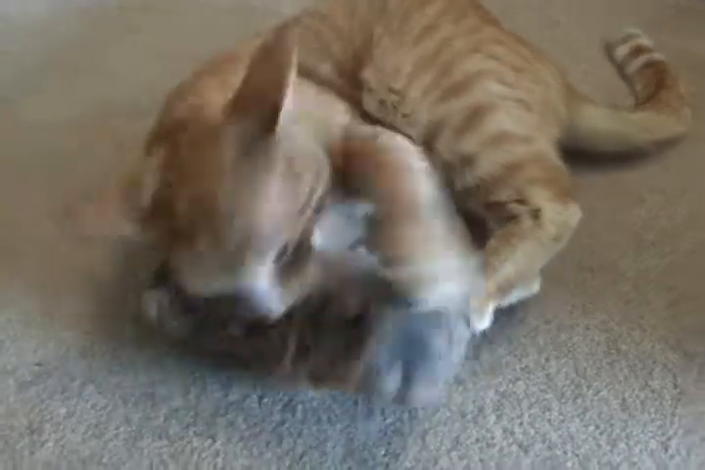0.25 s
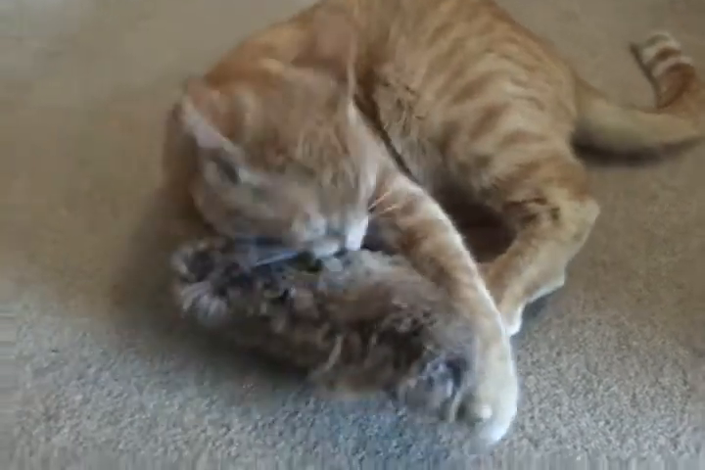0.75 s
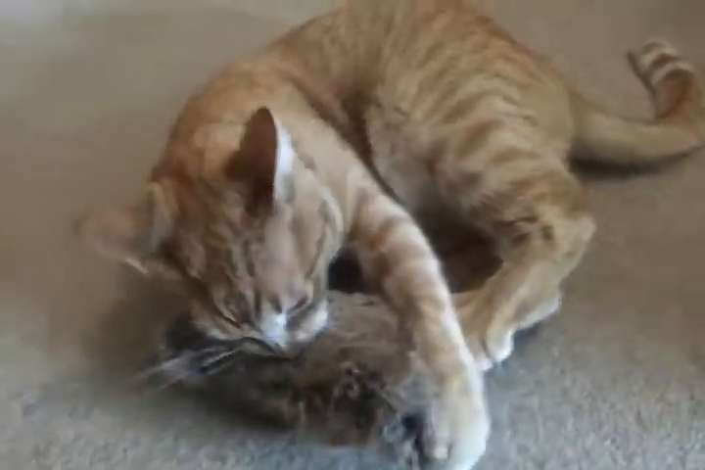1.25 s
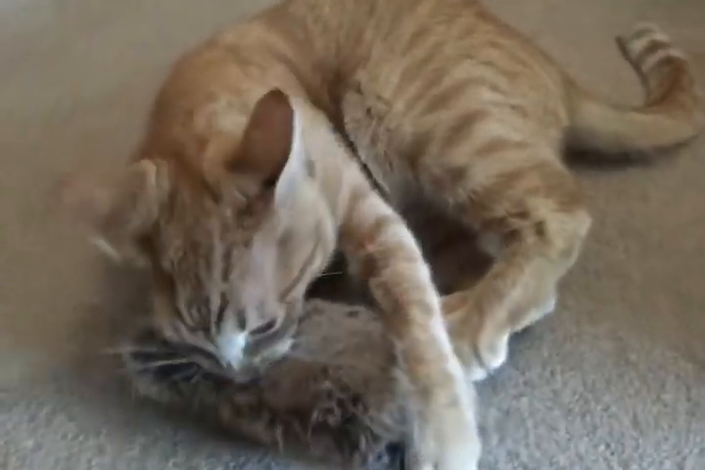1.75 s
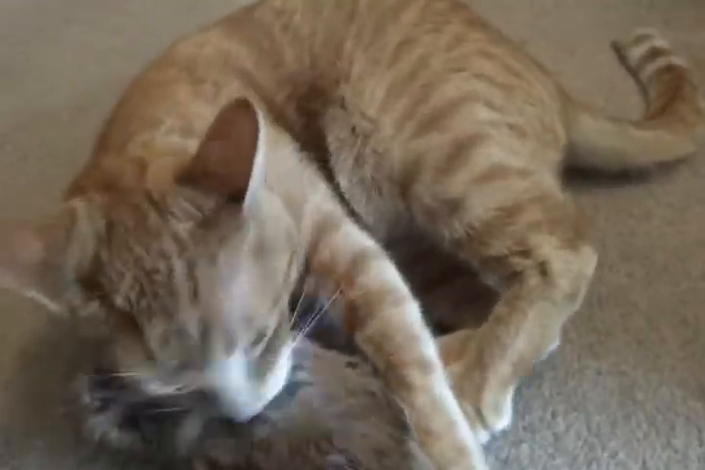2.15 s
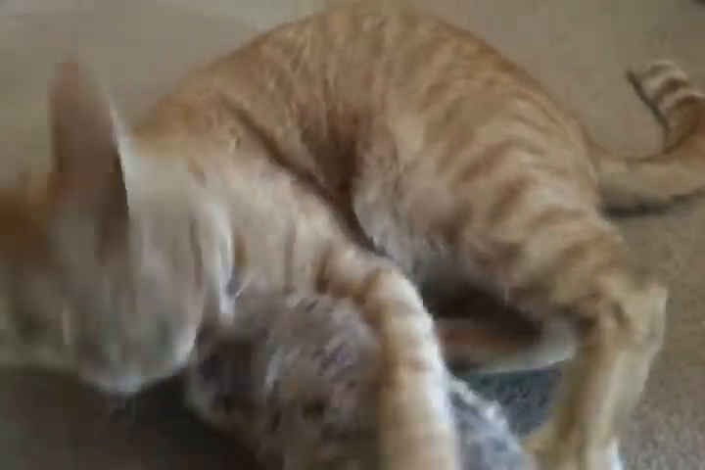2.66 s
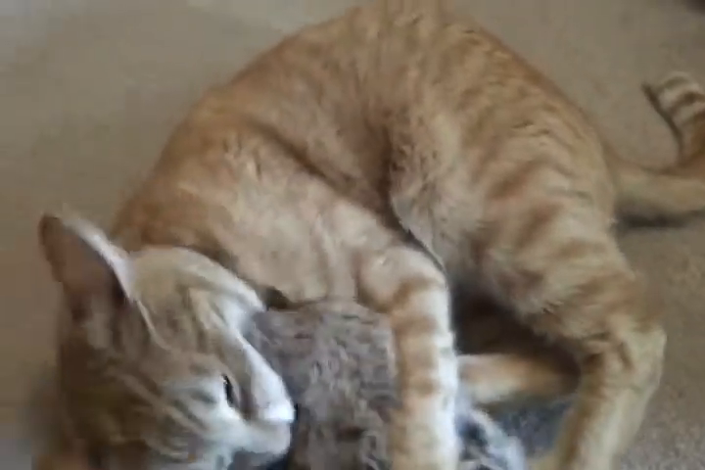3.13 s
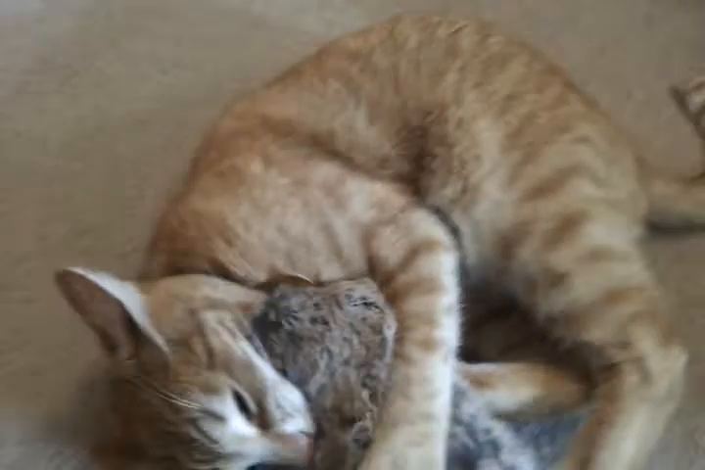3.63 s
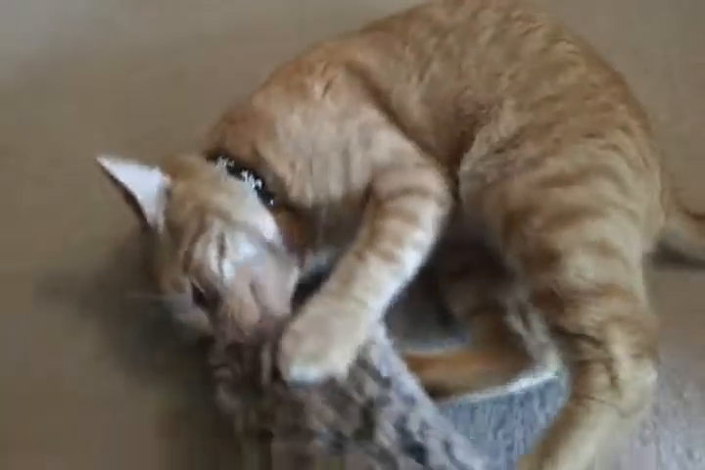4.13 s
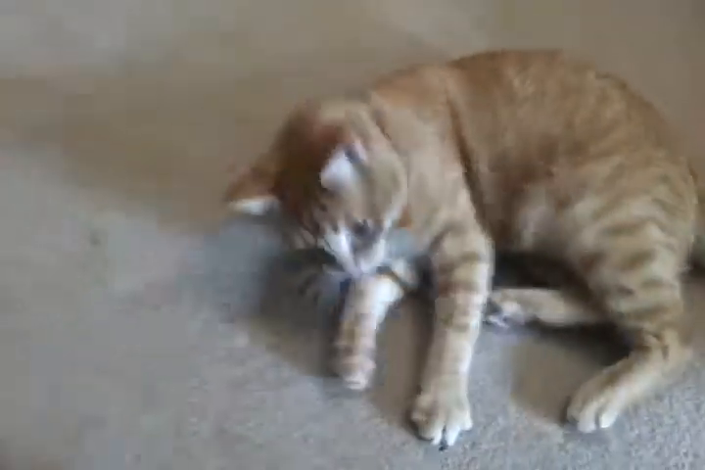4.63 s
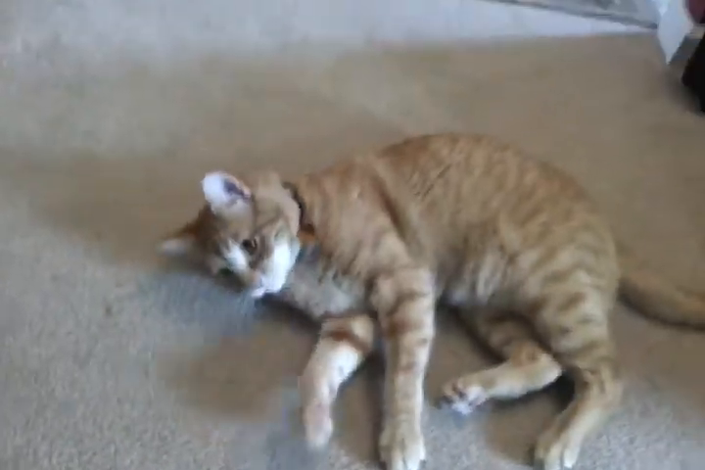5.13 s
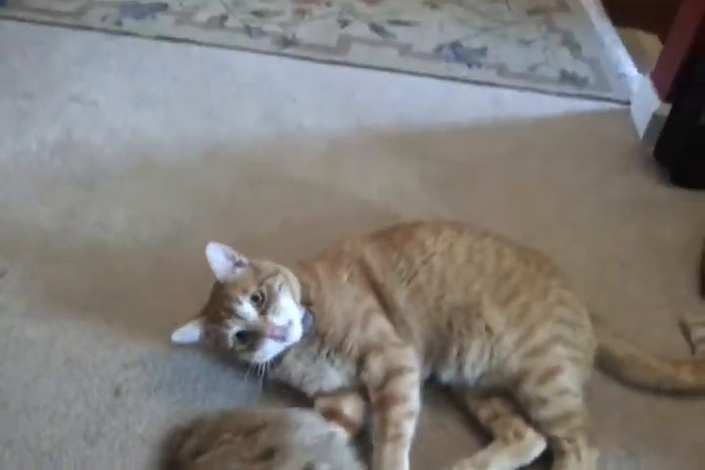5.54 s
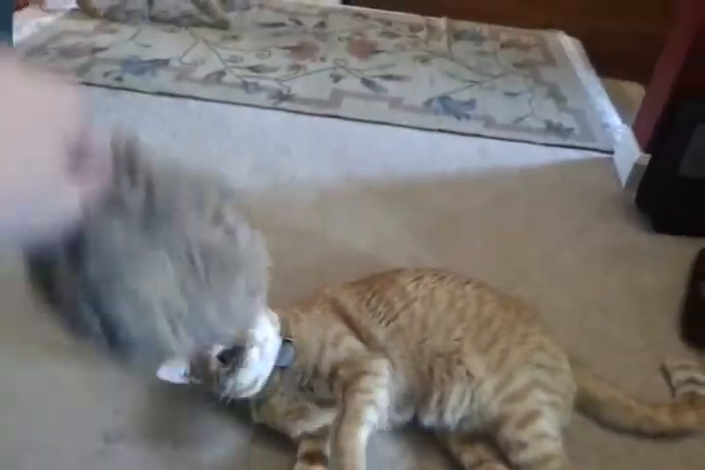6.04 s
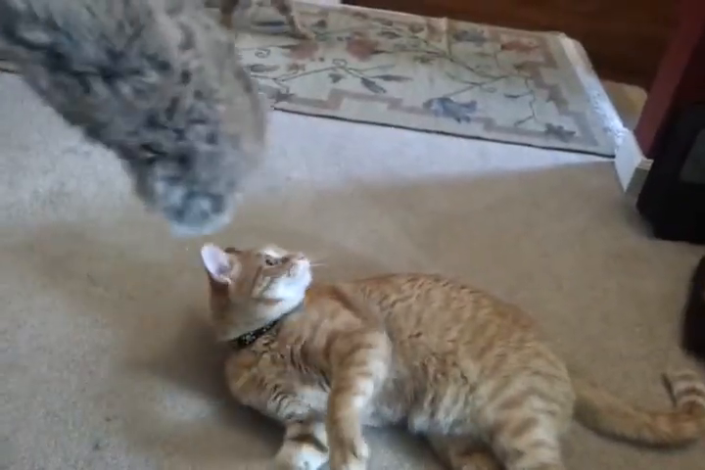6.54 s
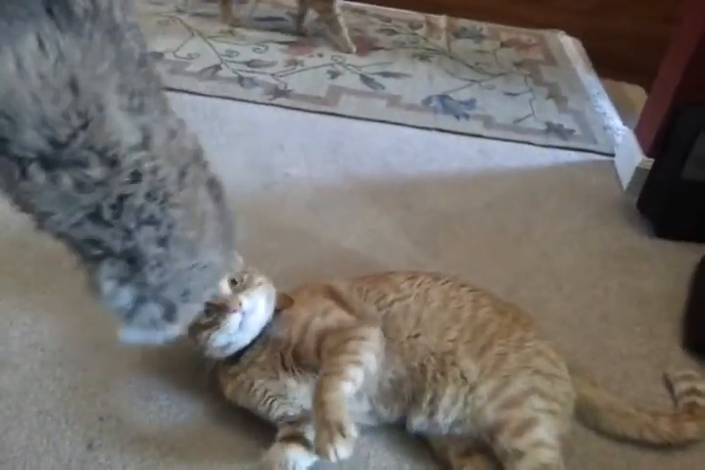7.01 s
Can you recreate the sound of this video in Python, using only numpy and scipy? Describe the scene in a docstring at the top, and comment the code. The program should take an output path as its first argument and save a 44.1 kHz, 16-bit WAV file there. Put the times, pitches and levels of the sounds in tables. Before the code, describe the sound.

A cat bites and kicks a fur toy on carpet, close to a small microphone in a quiet room with faint hiss. It opens with a quick cluster of dry tooth and claw clicks and soft paw thuds, over a faint fur rustle that swells and fades throughout. The loudest click snaps at 0.8 seconds. More clicks bunch up from 1.1 seconds, and at 1.2 a claw rasps briefly through the fur and slips free. Quieter rubbing follows, with a few clicks near 2.6 seconds and a thud near 3.9. At 4.4 seconds a slap knocks the toy away, followed by a soft thud. A faint, thin squeak comes at 4.9, then the metal collar tag clinks brightly twice and rattles to rest, with a last small tick at 5.5. From about 5.7 to 6.6 seconds the dangled toy rustles very softly, fading into room noise.

```python
"""A cat bites and kicks a fur toy on a carpet, close to a small microphone in a quiet room.
From the start, teeth and claws click and scrape, paws thud and fur rustles. At 1.2 s a claw rasps
through the fur and slips free. At 4.4 s the toy is knocked away with a slap. Around 5 s, just after
a thin squeak, the metal tag on the collar hits its ring, clinks and rattles to rest.
Last, the toy is dangled near the microphone with a soft rustle."""
import sys
import numpy as np
from scipy import signal
from scipy.fft import rfft, irfft, next_fast_len
from scipy.io import wavfile

SR = 44100
rng = np.random.default_rng(int(sys.argv[2]) if len(sys.argv) > 2 else 0)


def transcribe(u):
    """Save the signal u as a 16-bit wav file named by the first command-line argument.

    u: samples, shape (n,) or (channels, n), limited to [-1, 1]; the rate is SR.
    q: integer samples, one column per channel.
    """
    v = np.clip(np.atleast_2d(u).T, -1, 1)
    q = np.round(v * 32767).astype(np.int16)
    wavfile.write(sys.argv[1], SR, q)


N = 320827
TIME = np.arange(N) / SR
HIT_SAMPLES = 4096

# Dry clicks: teeth and claws, then at 5.55 s a last small tick of the collar tag.
# A higher Q means a narrower resonance that rings longer.
# (time [s], body pitch [Hz], body level [dB], crack pitch [Hz], crack level [dB], tick [dB], body Q)
DRY_CLICKS = [(0.0277, 540, -8.5, 2830, -18, -30, 0.66), (0.0325, 650, 1.5, 1730, -1.5, -35, 1.6),
              (0.0519, 206, 2, 2760, -9.5, -10, 1.3), (0.0614, 1080, 3, 2870, 15, 8, 1.8),
              (0.119, 530, 1.5, 1590, 13.5, -29, 1.05), (0.1949, 970, 3, 1190, -1.5, -14.5, 1.03),
              (0.2885, 424, 2, 2920, -7.5, -40, 0.83), (0.3003, 470, -2.5, 2720, -29, -41, 1.3),
              (0.3443, 665, -6.5, 3330, -20, -35, 1.3), (0.454, 670, -1, 1670, -25, -41, 1.52),
              (0.7431, 686, 2, 1690, -15, -40, 1.33), (0.7855, 1192, 10, 3230, 8, 17.5, 1.96),
              (1.0518, 970, -4.5, 2830, -9, -38, 0.71), (1.0696, 727, 11, 1800, 5.5, -12.5, 1.38),
              (1.1372, 1160, -17, 2420, -4.5, -3.5, 1.36), (1.1584, 930, -12, 2470, -23, -10, 1),
              (1.1797, 470, 5, 2290, -4.5, 10, 0.66), (1.1871, 860, -9, 2670, -8, -0.5, 1.1),
              (1.2084, 470, -18, 2300, 5, -12, 1.6), (1.2115, 890, 2.5, 2230, 6, 3, 1.22),
              (1.9412, 380, -24, 1710, -13, -30.5, 0.85), (2.6053, 430, -8, 1620, -26, -42, 1),
              (2.6278, 533, 1.5, 1640, -3.5, -22, 1), (2.6362, 480, -2, 2060, -18, -25, 1.1),
              (2.8695, 513, -10, 1940, -18.5, -40, 1.5), (3.9394, 550, 2.5, 2420, -26, -32, 1.25),
              (4.4066, 690, -3, 2200, -25, -39, 1), (5.5507, 1320, -38, 3200, -15.5, -22, 3.4)]
# The slap that knocks the toy away: same columns as DRY_CLICKS
TOY_SLAPS = [(4.4253, 1130, 1, 4170, -2.5, 1.2, .7), (4.4276, 556, 10.7, 1260, 11, 2.2, 0.63)]
# The row at 0.78 s is a low rumble under the loudest, clipped click. In the other rows, paws, toy
# and body hit the carpet: (time [s], pitch [Hz], level [dB], Q)
LOW_THUDS = [(0.0501, 215, 12.5, 1.32), (0.0667, 200, 5.5, 0.65), (0.084, 210, 1, 0.8),
             (0.7845, 79.7, -1.5, 0.25), (1.1808, 254, -2.5, 0.86), (1.1875, 262, -0.5, 1.6),
             (3.333, 700, -14.5, 0.79), (3.9314, 330, 8.5, 2.7), (4.4274, 323, 10, 2.9),
             (4.6875, 175, 10, 1.74)]
# The tag hits its ring: (time [s], level [dB], ring time [x normal], tick [dB], favoured pitch [Hz])
TAG_HITS = [(0.0613, -41, 0.63, -33, 5300), (0.344, -33.5, 0.28, -29, 6100), (0.505, -44, 0.52, -22, 6200),
            (0.7864, -39.5, 0.44, -30.5, 5180), (3.473, -44.5, 0.6, -29, 5700),
            (3.575, -49, .45, -33, 5450), (4.722, -53, 1.8, -28, 6150), (4.847, -45, .23, -24, 6100),
            (4.9923, -22, 0.35, 3, 5700), (5.065, -21, .55, -1, 6200), (5.191, -39, 1.46, -20, 6240)]
# The tag's own tones: (pitch [Hz], level [dB], normal time to fade by 60 dB [s])
TAG_TONES = [(1950, -11, 0.029), (3570, -9, 0.034), (4630, -12.5, .06), (5212, -0.5, .085),
             (5600, 1.5, 0.03986), (5895, -7.5, 0.073), (6030, -5.5, 0.086), (6256, -5, 0.032),
             (6900, -14.5, 0.046)]
# Tone colour of the rattling tag: (frequency [Hz], level [dB])
RATTLE_COLOUR = [(180, -53), (300, -16.5), (476, -33), (735, -14.5), (1200, -18), (1610, -11.5),
                 (2220, -16.5), (3240, -12), (3880, -23), (4530, -4), (6160, -6), (8500, -8), (11000, -60),
                 (18700, -120)]
# The tag slides on its ring: (start [s], length [s], level [dB])
TAG_SLIDES = [(3.96, 0.048, -49), (4.011, 0.018, -58), (4.972, 0.026, -54)]
# Tone colour of a claw dragged through fur: (frequency [Hz], level [dB])
CLAW_COLOUR = [(180, -73), (300, -48), (483, -40), (666, -45), (777, -32), (1060, -24.5), (1610, -29),
               (2480, -19.5), (3100, -24.5), (5590, -6.5), (7290, -8.5), (8500, -6.5), (11000, -59),
               (18700, -120)]
# Claws and fur rub: (start [s], length [s], level [dB], pitch [Hz], Q)
RUB_STROKES = [(0.572, 0.026, -56, 950, 1.1), (0.877, 0.059, -61.5, 4300, 0.89),
               (0.992, 0.019, -53.5, 5460, 0.35), (1.732, 0.06, -63.5, 704, 0.59),
               (1.923, 0.028, -61.5, 2400, 0.47), (2.614, 0.069, -58, 597, 0.47),
               (2.649, .017, -52, 5200, 3.6), (2.698, 0.01, -57, 4800, 2.1), (3.024, .019, -62, 4300, 1.2),
               (3.463, 0.026, -53, 3700, 0.79), (3.9, .016, -55.5, 500, 1.2),
               (3.921, 0.061, -50.5, 567, 0.89), (4.032, .007, -57, 4400, 1.2),
               (4.268, 0.039, -56.5, 560, 1.1), (4.279, 0.026, -56, 3450, 0.71),
               (4.376, .023, -53, 1800, 0.44), (4.431, 0.06, -50.5, 2200, 0.72),
               (4.672, 0.076, -57, 259, 0.65), (5.72, 0.79, -70.5, 377, 1.14), (6.049, 0.54, -71, 5300, .7)]
# Bites, kicks and swings stir the fur: (time of the peak [s], level [dB], time to fade by 10 dB [s])
FUR_MOVES = [(0.21, -60, 0.5), (0.68, -58, 0.07), (1.1, -61, 0.4), (1.521, -61.5, 0.38), (1.88, -65.5, 0.1),
             (2.8, -65.5, 1), (3.451, -64, 0.46), (3.999, -53, 0.09), (4.4, -60, 0.3), (4.78, -62, 1),
             (6.27, -60.5, 0.38)]
# Tone colour of rustling fur: (frequency [Hz], level [dB])
RUSTLE_COLOUR = [(90, -16.5), (170, -4.5), (400, 2.5), (800, -0.5), (1500, -1.5), (3000, -6), (4500, -6),
                 (6000, -3.5), (7500, -14)]
# Thin squeaks that glide out and back:
# (start [s], length [s], pitch at both ends [Hz], middle pitch [Hz], level [dB], hiss against tone [dB])
SQUEAK_GLIDES = [(3.686, 0.11, 4800, 5130, -70, -10), (3.775, .11, 4760, 4560, -70, -12),
                 (4.889, 0.0685, 1925, 2494, -58.5, 2), (4.89, 0.076, 3100, 4750, -58.5, -1)]
# Tone colour of the room's echo: (frequency [Hz], level [dB])
ECHO_COLOUR = [(100, -18.5), (300, 5), (1300, -0.5), (2500, 1), (6000, -2.5), (8000, -5.5)]
# Tone colour of the quiet room and the microphone's hiss: (frequency [Hz], level [dB])
BACKGROUND_COLOUR = [(18, -46), (30, -24.5), (97, -9.5), (126, -7.5), (183, -4.5), (345, -4.5), (468, -5),
                     (650, -5.5), (1250, -8), (1380, -8), (1510, -9), (3440, -11), (6040, -12.5),
                     (6960, -17.5), (8200, -37), (10700, -67.5), (18000, -120)]


def clicks(rows, tick_hz=5650, tick_q=2.4, echo_db=-11, echo_s=.00079):
    """Each snap has a dull body, a sharper crack and a bright tick; a nearby surface makes it hollow."""
    out = np.zeros(N)
    for time, body_hz, body_db, crack_hz, crack_db, tick_db, q in rows:
        body = knock(body_hz, body_db, q)
        crack = knock(crack_hz, crack_db, 1.38 * q)
        tick = knock(tick_hz, tick_db, tick_q)
        add(out, time, body - crack + tick)
    echo = np.interp(TIME - echo_s, TIME, out, left=0)
    return out + gain(echo_db) * echo


def thuds():
    """A few slow vibrations make each soft blow on the carpet; a deep, low rumble also sits under the loudest
    click."""
    out = np.zeros(N)
    for time, hz, db, q in LOW_THUDS:
        add(out, time, knock(hz, db, q))
    return out


def collar_tag(hard_db=-31, bounce_s=.005, bounce_loss_db=9, rattle_db=-11, fade_db_per_s=422):
    """The tag hits its ring; after a hard hit it bounces, weaker each time, and rattles to rest."""
    out, rattle_level = np.zeros(N), np.zeros(N)
    for time, db, ring_scale, tick_db, favoured_hz in TAG_HITS:
        hard = db > hard_db
        for bounce in range(4 if hard else 1):
            loss = bounce * bounce_loss_db
            add(out, time + bounce * bounce_s, clink(db - loss, ring_scale, tick_db - loss, favoured_hz))
        if hard:
            add(rattle_level, time, gain(db + rattle_db - fade_db_per_s * TIME[:SR // 4]))
    rattle = unit(colour(crackle(per_second=3600, spread_db=2.5), RATTLE_COLOUR))
    return out + rattle * rattle_level


def clink(db, ring_scale, tick_db, favoured_hz, focus_db=9, focus_width_hz=450):
    """One hit on the tag: a tick, then ringing tones, which die sooner when it lies in the fur."""
    t = TIME[:HIT_SAMPLES]
    hz, tone_db, ring_s = np.transpose(TAG_TONES)[:, :, None]
    scatter_db, direction = rng.standard_normal((2, len(TAG_TONES), 1))
    # The spot that is hit sets how strongly, and in which direction, each tone starts.
    spot_db = focus_db * (np.exp(-((hz - favoured_hz) / focus_width_hz) ** 2) - 1)
    strength = np.sign(direction) * gain(db + tone_db + spot_db + scatter_db)
    fade = np.exp(-np.log(1000) * t / (ring_s * ring_scale))
    tones = strength * np.cos(2 * np.pi * hz * t) * fade
    tick = knock(5600, tick_db, 1.2) - knock(1900, tick_db - 11, 0.54)
    return tones.sum(axis=0) + tick


def tag_slide(q=55):
    """Rubbing on the ring makes the tag sing, favouring the tones that ring longest."""
    slips, pressure = crackle(per_second=4600, spread_db=2.0), np.zeros(N)
    for start, length, db in TAG_SLIDES:
        add(pressure, start, gain(db) * fade_in_out(length, edges=0.27))
    singing = sum(gain(db) * ring_s * resonate(slips, hz, q) for hz, db, ring_s in TAG_TONES)
    return unit(singing) * pressure


def claw_rasp(start_s=1.16, full_s=1.219, free_s=1.265, db=-32.5):
    """A claw drags through the hairs, gets louder as it speeds up, then slips free."""
    rasp = unit(colour(crackle(per_second=9000, spread_db=.5), CLAW_COLOUR))
    rise_db = 217.5 * np.minimum(TIME - full_s, 0)  # both slopes are in dB per second
    release_db = 5003 * np.minimum(free_s - TIME, 0)
    return rasp * gain(db + rise_db + release_db) * (TIME > start_s)


def rubs():
    """Claws and fur slide in many tiny slips that shake one resonance."""
    out, slips = np.zeros(N), crackle(per_second=4400, spread_db=1.0)
    for start, length, db, hz, q in RUB_STROKES:
        shape = fade_in_out(length)
        scrape = resonate(slips[int(start * SR):][:len(shape)], hz, q)
        add(out, start, gain(db) * shape * unit(scrape))
    return out


def fur_rustle(flutter_db=1.3):
    """Hairs rustle softly, swelling and fading with each movement."""
    hairs = unit(colour(crackle(per_second=4500, spread_db=2.0), RUSTLE_COLOUR))
    power = np.zeros(N)
    for peak_s, db, fade_s in FUR_MOVES:
        from_peak = np.maximum(TIME - peak_s, (peak_s - TIME) / 1.2)  # swells slower than it fades
        power += gain(db - 10 * from_peak / fade_s) ** 2
    return hairs * np.sqrt(power) * gain(flutter_db * wander(per_second=22))


def squeaks(width_hz=160):
    """Swirling air feeds a thin tone that glides out and back, with some hiss around it."""
    out, smooth = np.zeros(N), signal.butter(2, width_hz, fs=SR, output="sos")
    swirls = rng.standard_normal((len(SQUEAK_GLIDES), 3, SR // 4))
    for (start, length, end_hz, middle_hz, db, hiss_db), noise in zip(SQUEAK_GLIDES, swirls):
        shape = fade_in_out(length, edges=0.26)
        real, imaginary, air = noise[:, :len(shape)]
        hz = end_hz + (middle_hz - end_hz) * np.sin(np.linspace(0, np.pi, len(shape)))
        waver = signal.sosfilt(smooth, real + 1j * imaginary)
        tone = np.real(waver * np.exp(2j * np.pi * np.cumsum(hz) / SR))
        hiss = gain(hiss_db) * unit(resonate(air, hz.mean(), 1.4))
        add(out, start, gain(db) * shape * (unit(tone) + hiss))
    return out


def room_echo(sound, fade_s=0.13, delay_s=.003):
    """A carpeted room gives a short, blurred echo that drops by 60 dB in fade_s."""
    t = TIME[:SR // 2]
    noise = colour(rng.standard_normal(len(t)), ECHO_COLOUR)
    tail = noise * np.exp(-np.log(1000) * t / fade_s) * (t > delay_s)
    return signal.fftconvolve(sound, tail / np.sqrt(np.sum(tail ** 2)))[:N]


def background(db=-64.5, drift_db=1.2):
    """Faint room noise and microphone hiss, drifting a little in level."""
    noise = unit(colour(rng.standard_normal(N), BACKGROUND_COLOUR))
    return noise * gain(db + drift_db * wander(per_second=7.2))


def knock(hz, db, q):
    """One sharp push on a resonance that soon dies away."""
    return gain(db) * resonate(signal.unit_impulse(HIT_SAMPLES), hz, q)


def resonate(sound, hz, q):
    """Pass a sound twice through a resonance, keeping what lies near hz."""
    b, a = signal.iirpeak(hz, max(q, .35), fs=SR)
    return signal.lfilter(b, a, signal.lfilter(b, a, sound + 1e-18))


def crackle(per_second, spread_db):
    """Surfaces catch and let go: many tiny ticks, a few of them large."""
    size = gain(spread_db * np.minimum(rng.exponential(size=N), 5))
    catches = rng.random(N) < per_second / SR
    return unit(catches * size * rng.standard_normal(N))


def colour(sound, points):
    """Make a sound's frequencies louder or softer along a (frequency [Hz], level [dB]) curve."""
    hz, db = np.transpose(points)
    size = next_fast_len(len(sound))
    frequencies = np.fft.rfftfreq(size, 1 / SR) + 1
    curve = gain(np.interp(np.log(frequencies), np.log(hz), db))
    return irfft(rfft(sound, size) * curve, size)[:len(sound)]


def fade_in_out(length, edges=0.39):
    """Loudness of a slide: it fades in, holds and fades out."""
    return signal.windows.tukey(int(length * SR), edges)


def wander(per_second):
    """A slow random drift, mostly between -1 and 1."""
    return 1.1 * np.interp(TIME * per_second, np.arange(N), rng.standard_normal(N))


def add(out, time, sound):
    """Mix a sound in at a time in seconds."""
    first = int(time * SR)
    out[first:first + len(sound)] += sound[:N - first]


def gain(db):
    """Turn decibels into a multiplier."""
    return 10 ** (np.asarray(db) / 20)


def unit(sound):
    """Scale a sound to an average (rms) level of 1."""
    return sound / np.sqrt(np.mean(sound ** 2))


def scene():
    """The close sounds stay almost free of echo; the slap and the tag carry into the room."""
    slap = clicks(TOY_SLAPS, tick_hz=5530, tick_q=1.5)
    tag = collar_tag() + tag_slide()
    close = clicks(DRY_CLICKS) + thuds() + rubs() + claw_rasp() + squeaks() + fur_rustle()
    early_echo = gain(-14) * room_echo(slap, fade_s=0.024, delay_s=0.0025)  # off the floor and the cat
    late_echo = room_echo(gain(-14) * slap + gain(-16) * tag + gain(-42) * close)
    return (close + slap + tag + early_echo + late_echo + background())[None]


def record(dry, opening_hz=4330, treble_hz=7354, band_hz=9200, top_hz=15000, ceiling=0.74):
    """A small microphone loses the high treble and clips the very loudest peak."""
    _, poles = signal.iirpeak(opening_hz, Q=2.3, fs=SR)
    heard = signal.lfilter(poles[::-1], poles, dry)  # its opening delays the treble near its resonance
    heard = signal.sosfilt(signal.butter(14, treble_hz, fs=SR, output="sos"), heard)
    heard = signal.sosfilt(signal.ellip(8, .2, 70, band_hz, fs=SR, output="sos"), heard)
    clipped = np.clip(heard, -ceiling, ceiling)
    return signal.sosfilt(signal.ellip(8, .2, 70, top_hz, fs=SR, output="sos"), clipped)


dry = scene()
out = record(dry)
transcribe(out)
```